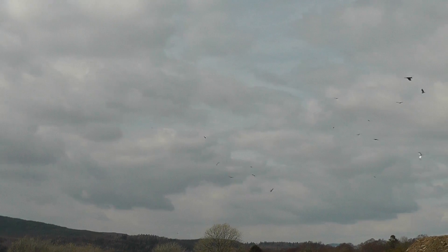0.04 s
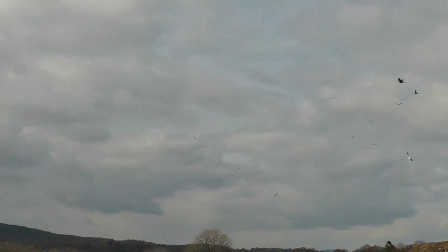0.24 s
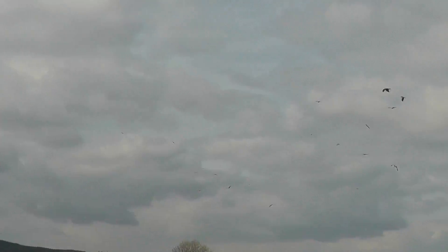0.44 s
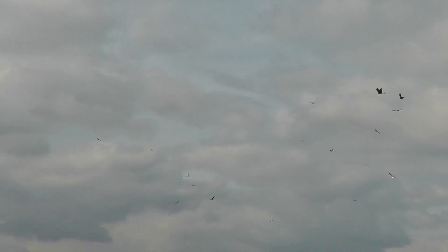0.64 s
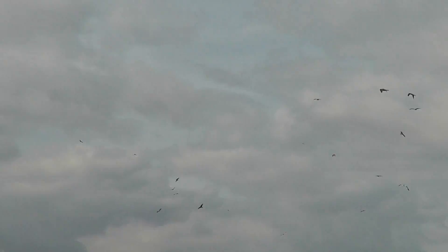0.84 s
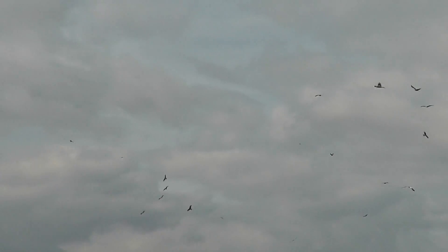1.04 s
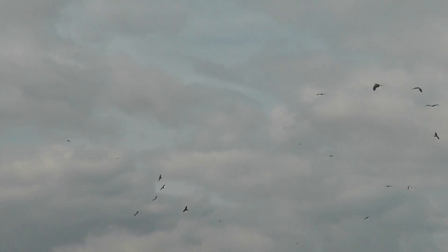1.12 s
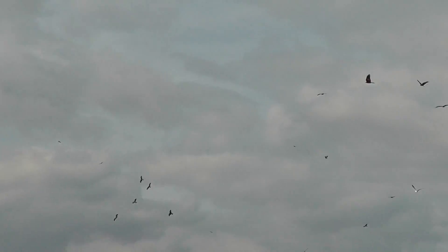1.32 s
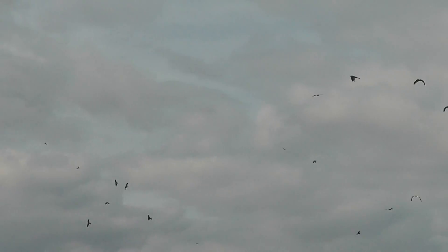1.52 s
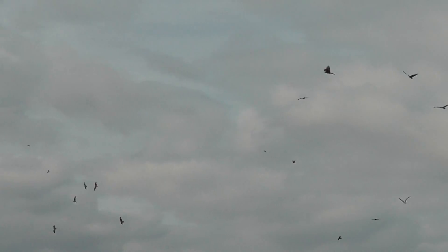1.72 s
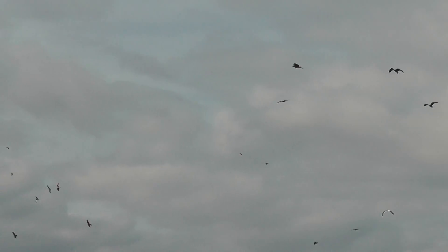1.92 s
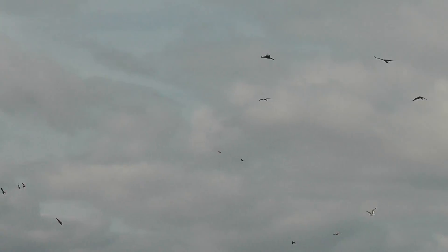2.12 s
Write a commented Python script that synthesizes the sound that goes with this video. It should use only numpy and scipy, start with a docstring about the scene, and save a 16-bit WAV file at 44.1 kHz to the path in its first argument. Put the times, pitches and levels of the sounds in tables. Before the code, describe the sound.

A bird of prey gives one thin, drawn-out whistle over open country, after low gusts of wind buffet the microphone and begin to ease. Faint camera ticks and a distant songbird lie behind.

```python
"""A red kite in the wind

A red kite overhead gives one thin whistle: a quick upward flick, a hoarse arch, then a long, slowly
sinking note. Gusts buffet the microphone, one with a sharp snap, and die down. The hand-held camera
whirrs and ticks. Behind it all lie a far songbird and the faint rush of open country."""
import sys
import numpy as np
from scipy import signal
from scipy.io import wavfile
from scipy.ndimage import uniform_filter1d

SR = 44100
rng = np.random.default_rng(int(sys.argv[2]) if len(sys.argv) > 2 else 0)


def put_to_file(sound):
    """Save the sound as 16-bit audio at rate SR, in the file named by the first command-line argument."""
    columns = np.atleast_2d(sound).T  # one column per channel
    safe = np.clip(columns, -1, 1)
    whole_steps = np.round(safe * 32767)
    wavfile.write(sys.argv[1], SR, whole_steps.astype(np.int16))


N = 94815
T = np.arange(N) / SR


def from_db(db):
    """Turn decibels into a number to multiply by."""
    return 10 ** (np.asarray(db) / 20)


def unit_power(x):
    """Scale a signal to an average power of 1."""
    return x / np.sqrt(np.mean(x ** 2) + 1e-20)


def in_time(rows):
    """Join (time, value) points with straight lines."""
    return np.interp(T, *np.transpose(rows))


def at_hz(points, hz):
    """Read between (frequency, value) points, giving each octave equal room."""
    freqs, values = np.transpose(points)
    return np.interp(np.log(hz), np.log(freqs), values)


def drift(rate):
    """A smooth random wobble of about 1 either way; a higher rate wobbles faster."""
    pole = np.exp(-16 * np.pi * rate / SR)
    slow = signal.lfilter([1], [1, -2 * pole, pole * pole], rng.standard_normal(N // 8 + 4002))[4000:]
    return np.interp(np.arange(N) / 8, np.arange(len(slow)), unit_power(slow))


def hump(s, half_s):
    """A smooth swell and fall around time s."""
    return np.exp(-np.minimum(((T - s) / half_s) ** 2, 100))


def pan(left_db):
    """Two gains that make the left side left_db louder than the right."""
    return from_db(np.array([[.5], [-.5]]) * left_db)


def resonate(x, hz, width_hz):
    """Pass a sound twice through one resonance, keeping what lies near hz."""
    r = np.exp(-np.pi * width_hz / SR)
    b = np.array([1, 0, -1]) * (1 - r * r) / 2
    a = [1, -2 * r * np.cos(2 * np.pi * hz / SR), r * r]
    return signal.lfilter(b, a, signal.lfilter(b, a, x))


def ringing_noise(modes):
    """Noise coloured by a set of resonances."""
    return unit_power(sum(from_db(db) * resonate(rng.standard_normal(N), hz, 2 * width)
                          for hz, width, db in modes))


def noise_bands(spectrum, likeness):
    """Stereo noise as (centres, bands). Likeness near 1 makes the sides alike, near -1 opposite."""
    edges = np.geomspace(22, 17000, 25)
    centres = np.sqrt(edges[1:] * edges[:-1])
    white, bands = rng.standard_normal((2, 2, N)), []
    for k, hz in enumerate(centres):
        bandpass = signal.butter(3, edges[k:k + 2], "band", fs=SR, output="sos")
        mid, side = signal.sosfilt(bandpass, white[k % 2])
        alike = np.clip(at_hz(likeness, hz), -.99, .99)
        stereo = np.sqrt(1 + alike) * mid + np.sqrt(1 - alike) * side * [[1], [-1]]
        bands.append(from_db(at_hz(spectrum, hz)) * stereo)
    return centres, np.array(bands) / np.std(sum(bands))


def noise(spectrum, likeness):
    """All the bands added into one stereo noise."""
    return noise_bands(spectrum, likeness)[1].sum(axis=0)


# tone colour of the far rush and of the hiss (frequency [Hz], relative level [dB])
COUNTRY_COLOUR = [(30, -5), (100, 8), (300, -0.5), (550, -1.5), (900, -1), (1300, -5.5), (1550, -12.5),
                  (1800, -21), (2150, -18.5), (2500, -18.5), (4000, -38), (15000, -59)]
HISS_COLOUR = [(100, 22.5), (2000, 10), (3200, 6.5), (4600, 2.5), (6100, 1), (7000, 8), (8200, 3),
               (9800, 1.5), (15500, -0.5)]
def background():
    """Open country rushes steadily far away, and the microphone hisses."""
    country = noise(COUNTRY_COLOUR, likeness=[(100, .38), (700, .083), (2000, .037)])
    hiss = noise(HISS_COLOUR, likeness=[(2500, .17), (4300, 1), (8000, .63), (15000, .35)])
    return from_db(-46.5) * pan(2) * country + from_db(-57.5) * hiss


# strength of the gusts (time [s], relative level [dB])
GUSTS = [(0, -27.5), (.08, -40), (.18, -28), (.225, -19.5), (.25, -24.5), (.285, -14.5), (.35, -20.5),
         (.375, -15.5), (.41, -18.5), (.445, -13), (.53, -24.5), (.57, -17), (.66, -21), (.76, -17.5),
         (.83, -20.5), (.865, -27), (.915, -19), (1.01, -29), (1.07, -32.5), (1.11, -23), (1.18, -24),
         (1.225, -30.5), (1.27, -25), (1.37, -29.5), (1.41, -30.5), (1.44, -27), (1.5, -44.5), (1.55, -29),
         (1.61, -28.5), (1.68, -36.5), (1.725, -26), (1.78, -35.5), (1.88, -25), (1.94, -44.5),
         (2.0, -35.5), (2.15, -43)]
# tone colour of the wind (frequency [Hz], relative level [dB])
WIND_COLOUR = [(15, -52), (25, -69), (58, -6.5), (102, 0), (173, -1), (404, -11.5), (579, -22.5),
               (701, -22.5), (1170, -35.5), (1330, -52.5), (3300, -79), (4000, -72.5), (5200, -90),
               (8800, -120)]
# how alike the wind is on the left and right (frequency [Hz], likeness)
WIND_LIKENESS = [(60, 0.7), (150, 0.55), (260, 0.35), (400, -0.54), (700, -0.8), (1600, -1.25),
                 (3000, 0.97)]
def wind():
    """Swirling air rumbles on the microphone; stronger gusts sound brighter."""
    strong_db, lump_db, patchy_db = -16, 2.0, 1.16
    brightening_per_octave, steady_s = .28, .035
    gust_db = in_time(GUSTS) - strong_db + lump_db * drift(90.5)
    centres, bands = noise_bands(WIND_COLOUR, WIND_LIKENESS)
    # even out the noise's own swells so that the gusts lead
    power = uniform_filter1d(np.mean(bands.sum(axis=0) ** 2, axis=0), size=int(steady_s * SR))
    steady = 1 / np.sqrt(uniform_filter1d(power, size=int(steady_s * SR / 2)) + .05)
    out = 0
    for hz, band in zip(centres, bands):
        swing = 1 + brightening_per_octave * np.log2(hz / 130)
        out += band * from_db(swing * gust_db + patchy_db * drift(40))
    return from_db(strong_db + 1.5) * steady * out


# loudness of the whirr (time [s], level [dB])
WHIRR_LEVEL = [(.2, -84), (.35, -76.5), (.6, -72.5), (.92, -73), (1.05, -85)]
# where the whirr rings (frequency [Hz], width [Hz], relative level [dB])
WHIRR_MODES = [(6070, 610, 2.5), (7360, 300, -1), (8700, 370, 3)]
def camera_whirr():
    """The camera whirrs faintly as it swings up."""
    return from_db(in_time(WHIRR_LEVEL)) * ringing_noise(WHIRR_MODES)


# the songbird's notes (start time [s], level [dB])
CHIRPS = [(.25, -63), (.35, -73), (.45, -64), (.545, -65), (.65, -68), (.745, -64.5), (.85, -63.5),
          (.94, -63.5), (1.12, -64)]
def songbird():
    """A small bird sings a run of short falling notes, blurred by distance."""
    length_s, start_hz, fall_hz_per_s = .075, 3850, 19000
    out, blur_hz = 0, 255.4 * drift(300)
    for s, db in CHIRPS:
        hz = start_hz - fall_hz_per_s * np.clip(T - s, 0, length_s) + blur_hz
        swell = hump(s + length_s / 2, length_s / 2)
        out += from_db(db) * swell * np.sin(2 * np.pi * np.cumsum(hz) / SR)
    return out


# low thumps of air (time [s], level [dB], pitch [Hz], half length [s])
THUMPS = [(.279, -10.5, 97, 0.0062), (.429, -2.5, 145.8, 0.0062), (.590, -16.5, 266, 0.0053),
          (.491, -9, 94, 0.0055), (.616, -11.5, 151, 0.012), (.711, -13, 92, 0.012),
          (.826, -7, 110, 0.0033), (.912, -11.5, 115.4, 0.018), (1.267, -16.5, 111, 0.011),
          (1.426, -8, 157, 0.0042), (1.728, -16.5, 133, .006)]
# brighter flaps of air (time [s], level [dB], half length [s])
FLAPS = [(0.294, -28.5, 0.019), (0.388, -25.5, 0.01), (0.426, -23.5, 0.0057), (0.497, -28.5, 0.0036),
         (0.591, -14.5, 0.0065), (.606, -15.5, 0.0069), (0.752, -23.5, 0.0046), (0.918, -29.5, 0.004),
         (1.155, -27, 0.0046), (1.427, -33, 0.0056), (1.704, -39, 0.0059)]
# tone colour of a flap (frequency [Hz], relative level [dB])
FLAP_COLOUR = [(200, -23), (450, 10), (750, -8.5), (1200, -13), (2000, -43.5), (5000, -72), (15000, -85)]
def buffets():
    """Single swirls of air thump the microphone; small ones flap at a higher pitch."""
    thumps = sum(from_db(db) * hump(s, half_s) * np.sin(2 * np.pi * hz * (T - s))
                 for s, db, hz, half_s in THUMPS)
    flap_level = sum(from_db(db) * hump(s, half_s) for s, db, half_s in FLAPS)
    return thumps + flap_level * noise(FLAP_COLOUR, WIND_LIKENESS) * pan(3)


# camera ticks (time [s], relative level [dB], body's share [0-1], left over right [dB])
TICKS = [(0.297, -53.5, .05, 5), (0.339, -50, 0.45, 3.5), (0.379, -49.5, .05, 6), (.711, -47.5, 0.3, -3),
         (.725, -53, .05, 1), (1.212, -57, 0, 0), (1.410, -39.5, 0.98, 2), (1.514, -50, 0, -4),
         (1.845, -50, .05, 11), (1.959, -47, 0.55, 8), (1.993, -52, .05, 3), (2.009, -48.5, .05, 11),
         (2.024, -42.5, 0.1, 6), (2.039, -45, .03, 7), (2.111, -49, 0.5, 7)]
# where the camera's shell and body ring (frequency [Hz], width [Hz], relative level [dB])
SHELL_MODES = [(5960, 720, 4), (8100, 400, 8.5), (12500, 5000, -15)]
BODY_MODES = [(2400, 1200, 0.5), (5000, 660, 3), (6700, 900, -4)]
def camera_ticks():
    """Tiny slips of the grip shake the camera's thin shell and, when firmer, its body."""
    shell, body = ringing_noise(SHELL_MODES), ringing_noise(BODY_MODES)
    out, half_s = 0, .0014
    for s, db, share, left_db in TICKS:
        ring = (1 - share) * shell + share * body
        out += from_db(db - 4) * pan(left_db) * hump(s + half_s / 2, half_s) * ring
    return out


# tone colour of the snap (frequency [Hz], relative level [dB])
SNAP_COLOUR = [(400, 5.5), (1200, 7.5), (2500, -8), (4500, -17), (6000, -26), (15000, -45)]
def wind_snap():
    """One gust snaps sharply on the microphone."""
    return from_db(-28) * pan(7) * hump(s=.5896, half_s=.0007) * noise(SNAP_COLOUR, WIND_LIKENESS)


# the whistle's tune (time [s], pitch [Hz])
WHISTLE_PITCH = [(1.25, 2340), (1.265, 2560), (1.273, 2610), (1.278, 2990), (1.305, 3100), (1.335, 3115),
                 (1.365, 3030), (1.395, 2890), (1.425, 2820), (1.555, 2790), (1.59, 2752), (1.635, 2762),
                 (1.67, 2742), (1.74, 2745), (1.79, 2715), (1.84, 2730), (1.9, 2685), (2.03, 2690),
                 (2.14, 2650)]
# loudness of the whistle and of its overtone an octave up (time [s], level [dB])
WHISTLE_LEVEL = [(1.24, -80), (1.26, -52), (1.27, -32.5), (1.278, -54), (1.295, -58), (1.372, -60),
                 (1.39, -43.5), (1.41, -42), (1.432, -52), (1.5, -55), (1.58, -44.5), (1.72, -48.5),
                 (1.79, -41.5), (1.86, -41.5), (1.95, -44), (2.04, -51.5), (2.085, -58), (2.125, -51),
                 (2.15, -73)]
OCTAVE_LEVEL = [(1.24, -79), (1.275, -70), (1.33, -67), (1.375, -63.5), (1.4, -78), (1.52, -76), (1.7, -69),
                (1.85, -76), (2.0, -73), (2.15, -81)]
# the whistle's balance between the ears (time [s], left over right [dB])
WHISTLE_LEFT = [(1.27, -12), (1.295, 3), (1.345, -2), (1.39, -9), (1.48, -15), (1.6, -7.5), (1.84, -17.5),
                (2.03, -22), (2.12, -4.5)]
# how hoarse the voice is (time [s], roughness [0-1])
HOARSENESS = [(1.268, .08), (1.3, 0.7), (1.365, 0.9), (1.39, 0.08), (1.46, 0.25), (1.58, 0.09), (1.8, 0),
              (2.14, 0)]
def kite():
    """The kite whistles a wavering, almost pure note that turns raspy where its voice is pressed."""
    waver_hz, waver_rate, rasp_rate, flutter_db, left_lead_rad = 11, 30, 170, 1.0, .27
    hz = in_time(WHISTLE_PITCH) + waver_hz * drift(waver_rate)
    level = from_db(in_time(WHISTLE_LEVEL) + flutter_db * drift(waver_rate))
    rough = in_time(HOARSENESS)
    # hoarseness shakes both the timing and the height of the wave
    phase = 2 * np.pi * np.cumsum(hz) / SR + rough * drift(rasp_rate) / 2
    height = np.sqrt(2) * level * (1 + rough * drift(rasp_rate) / 2)
    left = from_db(in_time(WHISTLE_LEFT)) * np.sin(phase + left_lead_rad)
    voice = height * np.array([left, np.sin(phase)])
    octave_level = from_db(in_time(OCTAVE_LEVEL) + 2.5 * drift(waver_rate))
    octave = np.sqrt(2) * octave_level * np.sin(2 * phase + .6 * drift(rasp_rate / 2))
    rasp_noise = unit_power(resonate(rng.standard_normal((2, N)), hz=2760, width_hz=810))
    rasp = from_db([[-.5], [4.5]]) * level * rough * rasp_noise
    started = T > WHISTLE_PITCH[0][0]
    return started * (voice + octave + rasp)


def echoes(call, count=40, fade_s=.34):
    """Ground and trees throw back faint echoes, different in each ear."""
    out = np.zeros((2, N))
    for k, delay_s in enumerate(rng.uniform(.01, .3, count)):
        ear, lag = k % 2, int(delay_s * SR) + 1
        out[ear, lag:] += from_db(-60 * delay_s / fade_s) * call[ear, :-lag]
    return from_db(-17) * out


def scene():
    """The kite calls above the landscape, the wind and the camera's small noises."""
    call = kite()
    surroundings = background() + wind() + camera_whirr() + songbird() + buffets() + camera_ticks()
    return surroundings + wind_snap() + call + echoes(call)


def record(dry):
    """The very highest treble is cut off steeply."""
    cutoff_hz = 15850
    return signal.sosfilt(signal.ellip(12, .1, 80, cutoff_hz, fs=SR, output="sos"), dry)


dry = scene()
out = record(dry)
put_to_file(out)
```